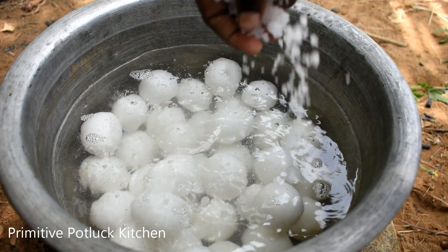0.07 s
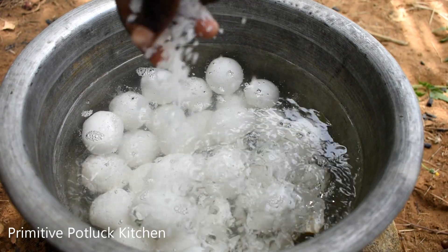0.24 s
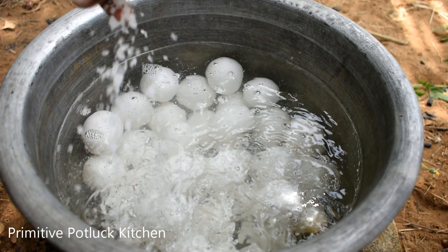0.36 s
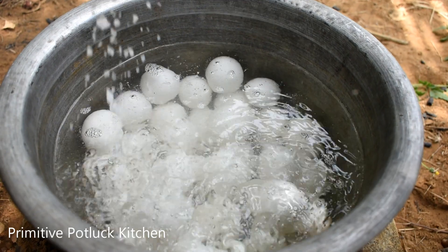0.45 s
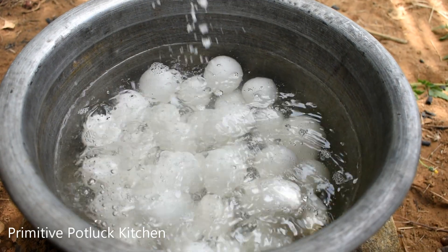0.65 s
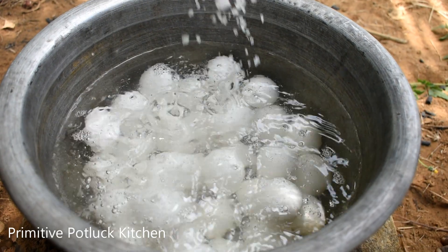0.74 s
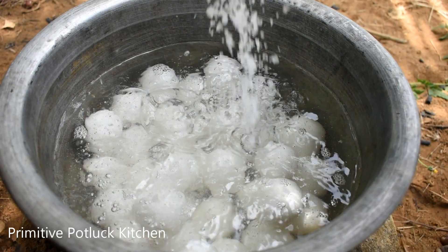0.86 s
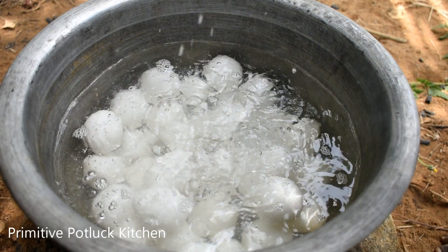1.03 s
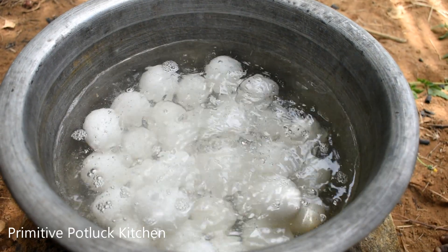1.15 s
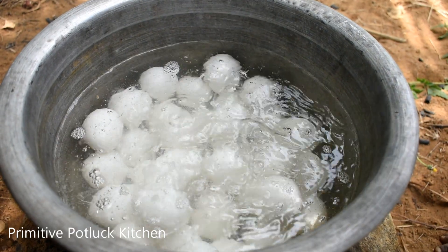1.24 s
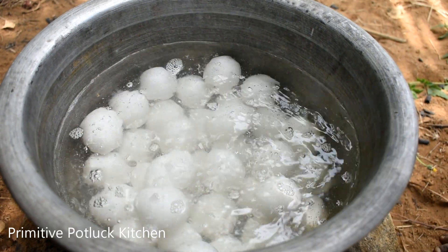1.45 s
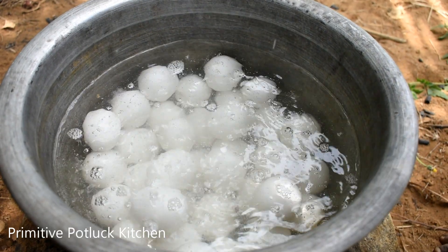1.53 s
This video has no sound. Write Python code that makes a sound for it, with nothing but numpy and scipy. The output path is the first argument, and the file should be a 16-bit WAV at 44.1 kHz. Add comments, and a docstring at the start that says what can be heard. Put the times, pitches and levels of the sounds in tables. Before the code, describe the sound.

Coarse salt patters into a metal pot of water and eggs outdoors, with sharp ticks on the shells, tiny splashes and bubbly plips close by. The sprinkle thins to a few stray ticks and a faint rustle.

```python
"""Outdoors, coarse salt is sprinkled into a metal pot of water and eggs.
Big crystals tick on the shells or slap the water and trap air bubbles that ring briefly.
Fine grains patter between them, and the pot's walls add a very short echo.
A small bird twitters faintly at first; near the end one grain pings on the pot and a little salt rustles."""
import sys
import numpy as np
from scipy import signal
from scipy.fft import rfft, irfft
from scipy.io import wavfile
from scipy.ndimage import uniform_filter1d

SR = 44100
rng = np.random.default_rng(int(sys.argv[2]) if len(sys.argv) > 2 else 0)


def file_out(sig):
    """Save sig as 16-bit WAV at sys.argv[1]."""
    # one column per channel
    cols = np.atleast_2d(sig).T
    # limit, then scale
    lim = np.clip(cols, -1, 1)
    pcm = np.round(lim * 32767).astype(np.int16)
    wavfile.write(sys.argv[1], SR, pcm)


N = 70560  # 1.6 seconds
TICK_RISE_MS = 0.048  # how fast a hit starts to ring
BUBBLE_RISE_SHARE = 0.07  # a bubble's rise time as a share of its fade time


def shell_ticks():
    """Big crystals hit the shells: a click, a very short ring, and echoes scattered among the eggs."""
    # crystals landing on eggshell: t/s, level/dB, f/Hz, fade time/ms
    shell_hits = [(.2160, -11.5, 7077, 1.7), (0.2503, -9, 9700, 0.52), (0.4211, -4.5, 9600, 0.27),
                  (0.4381, -9.5, 8400, 0.28), (.4431, -8, 10000, .16), (.4467, 3, 11250, 0.21),
                  (0.4479, 2.5, 9000, 0.14), (0.4565, 0.5, 8300, 0.29), (0.4585, -12.5, 6100, 0.57),
                  (.4694, -12, 7000, .35), (0.5228, -4, 8640, .5), (0.524, -8, 8050, 0.37),
                  (0.551, -12, 8400, 0.24), (0.573, -17, 12300, .25), (.5750, -13.5, 8870, 0.19),
                  (0.5933, -15, 9500, 0.3), (.6635, -6, 8400, 0.23), (.7148, -15, 7200, .3),
                  (.7190, -11.5, 8150, 0.27), (0.7421, -16.5, 7060, 0.34), (0.8732, -13, 5900, 0.22),
                  (0.8984, -14, 13000, 0.28), (0.915, -3, 7580, .28), (.9278, -11, 6800, 0.55),
                  (0.9452, -9, 6850, 0.34), (.9478, -14, 7100, 0.8), (0.9548, -1.5, 5460, 0.16),
                  (.9576, -1.5, 6820, 0.56), (0.9645, -15, 7200, .7), (1.047, -9, 13700, .3),
                  (1.0776, -8.5, 8500, 0.24), (1.0880, -7, 8400, 0.099), (1.163, -23, 6450, 0.38),
                  (1.2000, -24, 6390, 0.33), (1.2327, -22.5, 7680, 0.4), (1.2763, -20, 10300, 0.42),
                  (1.4698, -24, 9330, .6), (1.4873, -20, 9900, 0.22)]
    out, pulse = np.zeros(N), click()
    for start, db, hz, decay_ms in shell_hits:
        shell = amp(db) * ring(hz, decay_ms, TICK_RISE_MS)
        blip = ring(hz, decay_ms=0.047, rise_ms=TICK_RISE_MS)
        echoes = signal.fftconvolve(scatter(decay_ms=2.9), blip)
        echoes *= np.linalg.norm(shell) / np.linalg.norm(echoes)  # same energy as the ring
        add(out, start, shell)
        add(out, start, amp(-8) * echoes)
        add(out, start, amp(db - 7) * pulse)
    return amp(-2.5) * cut_bass(out, hz=2710)  # a small crystal gives off little bass


def splashes():
    """Crystals slap the water, throw a little spray and leave ringing bubbles."""
    # crystals landing on water: t/s, level/dB
    slaps = [(0.0862, -14.5), (.1812, -19), (0.2167, -9), (0.2288, -9.5), (0.2403, -16), (0.2835, -6.5),
             (.2902, -12), (.2949, -10.5), (0.3296, -13), (0.3452, -13), (0.356, -11), (0.365, -5),
             (.3995, -15), (.4035, -7.5), (0.5026, -11), (0.5165, -11), (0.6194, -5.5), (.6769, -17.5),
             (0.694, -16), (0.7372, -9.5), (0.7735, -15), (0.7893, -7.5), (0.796, -12.5), (0.8384, -6),
             (0.9573, -8), (0.9783, -12), (0.9918, -3.5), (1.0049, -16), (1.0403, -13), (1.0732, -9.5),
             (1.1027, -14)]
    # trapped air bubbles: t/s, level/dB, f/Hz, fade time/ms
    trapped_air = [(0.1813, -27.5, 4700, 1.3), (0.214, -21.5, 3730, 1.8), (0.2139, -17.5, 4890, 1.9),
                   (0.2292, -20.5, 2052, 4.5), (0.2407, -21.5, 1491, 4.1), (0.2538, -22.5, 3800, 0.99),
                   (0.283, -27, 1900, 2.9), (.3292, -27, 2880, 1.6), (0.3415, -22, 4177, 0.79),
                   (.349, -23, 3550, 1.6), (0.355, -27, 2630, 1.4), (.3722, -25.5, 1944, 3.6),
                   (0.3835, -24, 3600, 0.66), (0.4221, -18, 3020, 0.89), (.4400, -27, 2300, 2.7),
                   (.4430, -23, 2640, 2.3), (0.4468, -16.5, 2360, 0.9), (0.4514, -20, 1930, 2.3),
                   (0.456, -19.5, 4390, 1.9), (0.4916, -22.5, 1990, 2.5), (0.4945, -19.5, 3090, 1),
                   (.5027, -27, 2840, 2), (0.5155, -20, 1446, 2.36), (.5470, -26, 2940, 1.9),
                   (0.5514, -23.5, 2090, 2), (0.6192, -20.5, 1560, 5.2), (0.6513, -25.5, 3430, 1),
                   (.6624, -24.5, 3220, 1.5), (0.6772, -21, 3120, 2.2), (0.698, -26, 3700, .9),
                   (0.7368, -19, 2650, 1.3), (.7368, -17, 3400, 1.1), (0.7953, -20.5, 1960, 2.5),
                   (0.8390, -22.5, 1930, 3.3), (0.9207, -26, 2100, 4), (0.9252, -20.5, 2550, 1.8),
                   (0.9474, -18.5, 2000, 3.1), (.9510, -21, 3380, 1.8), (0.9729, -22.5, 1930, 2.8),
                   (0.9915, -18, 2080, 1.3), (0.9908, -34.5, 1042, 9), (1.0048, -20, 2030, 1.7),
                   (1.0130, -23, 3930, 1.1), (1.024, -27.5, 1710, 2.8), (1.0386, -23.5, 1837, 4.5),
                   (1.0499, -25, 3430, 2.6), (1.0528, -23, 1960, 2.6), (1.0730, -27.5, 2320, 3.23),
                   (1.0772, -21, 3000, 1.4), (1.0880, -22.5, 5040, 2.2)]
    # the biggest crystal's air pocket closing at the surface:
    # t/s, level/dB, f/Hz, fade time/ms, share of pitch gained each ms
    plop = (.9478, 0.87, 3850, 0.94, 0.074)
    out, pulse = np.zeros(N), click()
    for start, db in slaps:
        slap = amp(db - 1) * pulse
        spray = amp(-1.5) * signal.fftconvolve(scatter(decay_ms=0.69), slap)
        add(out, start, slap)
        add(out, start, spray)
    for start, db, hz, decay_ms in trapped_air:
        diving = bubble(hz, decay_ms, glide_per_ms=-0.0035)  # the pitch sinks as the bubble dives
        add(out, start, amp(db) * diving * churn())
    start, db, hz, decay_ms, climb = plop
    add(out, start, amp(db) * bubble(hz, decay_ms, climb))
    return cut_bass(out, hz=360)  # the water surface gives off little bass


def bubble(hz, decay_ms, glide_per_ms):
    """A pocket of air rings in the water, with little sound below its pitch."""
    tone = ring(hz, decay_ms, BUBBLE_RISE_SHARE * decay_ms, glide_per_ms)
    return cut_bass(tone, 0.37 * hz)


def churn(depth=0.22, size=2000):
    """Moving water makes a bubble's loudness flutter quickly."""
    return 1 + depth * wobble(size, smooth_samples=30)


def fine_salt():
    """Fine grains patter and bubble as the salt flows; clumps land as short, dense fizzes."""
    # how strongly the fine salt flows: t/s, level/dB
    flow_curve = [(0, -42.5), (.06, -49.5), (.09, -43), (.17, -46.5), (.205, -39), (.26, -34), (.31, -37.5),
                  (.41, -36.5), (.53, -31), (.6, -45.5), (.65, -38.5), (.69, -43), (.74, -32), (.77, -39.5),
                  (.81, -33.5), (.85, -40.5), (.9, -31.5), (.97, -32), (1.025, -34), (1.07, -31),
                  (1.105, -44), (1.16, -37.5), (1.2, -48.5), (1.3, -47), (1.6, -50.5)]
    # clumps of grains landing together: t/s, length/s, level/dB
    clumps = [(0.245, 0.022, -32.5), (0.458, 0.023, -33), (0.53, 0.011, -38), (0.63, 0.0087, -33.5),
              (0.797, 0.0051, -29), (0.855, .012, -32), (0.918, 0.011, -27), (1.034, 0.024, -26.5)]
    # tone colour of the grains: f/Hz, level/dB
    grain_colour = [(200, -41), (700, -9.5), (1300, -11), (2000, -6), (3400, -3.5), (5800, -2.5), (8000, 0),
                    (13000, -2.5), (16000, -10.5)]
    t = np.arange(N) / SR
    flow = amp(np.interp(t, *np.transpose(flow_curve)))
    bursts = np.zeros(N)
    for start, length, db in clumps:
        add(bursts, start, amp(db) * signal.windows.tukey(round(length * SR), 0.5))
    shower = coloured(patter(), grain_colour) + amp(-12.5) * small_bubbles()
    fizz = coloured(patter() + patter(), grain_colour)
    return flow * shower + bursts * fizz


def patter(pitches=40, spread_db=4):
    """Grains of many sizes land at random, each with a tiny ring; high ones come more often."""
    out = np.zeros(N)
    for hz in np.geomspace(800, 15500, pitches):
        hits_per_s = 3900 / pitches * np.sqrt(hz / 5000)
        strength = amp(spread_db * np.minimum(rng.exponential(1, N), 3.5))
        hits = strength * rng.choice([-1, 1], N) * (rng.random(N) < hits_per_s / SR)
        decay_cycles = 2.2 * rng.uniform(0.5, 1.5)
        grain = ring(hz, 1000 * decay_cycles / hz, TICK_RISE_MS)
        # high pitches lie further apart, so they are made louder to keep the tone even
        out += np.sqrt(hz) * unit(signal.oaconvolve(hits, grain)[:N])
    return out


def small_bubbles(pitches=24, bubbles_per_s=180, decay_cycles=6.8):
    """Many little bubbles of random size ring under the falling grains."""
    out = np.zeros(N)
    for hz in np.geomspace(1500, 5500, pitches):
        hits = rng.uniform(0.17, 1, N) * (rng.random(N) < bubbles_per_s / pitches / SR)
        decay_ms = 1000 * decay_cycles / hz
        out += signal.oaconvolve(hits, ring(hz, decay_ms, BUBBLE_RISE_SHARE * decay_ms))[:N]
    return unit(out)


def pot_ping(start=1.4227, level_db=-28):
    """A stray grain makes the metal wall ring with several tones at once."""
    # the pot's own tones: f/Hz, level/dB, time to fade by 60 dB/s
    pot_tones = [(4070, -23, .07), (6153, -19, .08), (8000, -7, 0.059), (8694, -8, 0.049),
                 (10600, -1, 0.013), (11500, -4, 0.022), (15300, -1, .008)]
    out, t = np.zeros(N), np.arange(SR // 10) / SR
    for hz, db, fade_s in pot_tones:
        add(out, start, amp(level_db + db - 60 * t / fade_s) * np.sin(2 * np.pi * hz * t))
    return out


def pot_walls(sound, echo_db=-11, delay_s=0.001, fade_s=0.03):
    """Sound bounces between the water and the wall, adding dense echoes that die quickly."""
    t = np.arange(SR // 10) / SR
    tail = rng.standard_normal(len(t)) * (t > delay_s) * amp(-60 * t / fade_s)
    return sound + amp(echo_db) * signal.oaconvolve(sound, tail / np.linalg.norm(tail))[:N]


def salt_rustle():
    """Dry grains slide over each other: a quick swell and a slower fade."""
    # the slide: t/s, rise time/s, fade time/s, level/dB
    slide = (1.452, .035, .14, -40.5)
    # tone colour of dry salt: f/Hz, level/dB
    rustle_colour = [(1000, -45), (4000, -17), (7000, -9), (9300, -2), (12000, -4.5), (16000, 0)]
    start, rise, decay, db = slide
    t = np.arange(N) / SR - start
    swell = np.clip(t / rise, 0, 1)
    fade = np.exp(-np.maximum(t - rise, 0) / decay)
    return amp(db) * swell * fade * coloured(patter() + patter(), rustle_colour)


def bird(start=0.0155, end=0.192, period_s=0.0293, low_hz=5300, high_hz=5730, wander_hz=69):
    """A distant bird's trill grows louder; its whistle swings up softly and down more strongly."""
    t = np.arange(N) / SR
    turn = 2 * np.pi * (t - start) / period_s
    hz = low_hz + (high_hz - low_hz) * np.sin(turn / 2) ** 2
    hz += wander_hz * wobble(N, smooth_samples=900)  # no two swings are alike
    rising = np.sin(turn) > 0
    strokes = abs(np.sin(turn)) * np.where(rising, amp(-10), 1)
    swell = amp(-35.5 - 100 * abs(end - t)) * (t > start) * (t < end)  # gains 100 dB a second
    return swell * strokes * np.sin(2 * np.pi * np.cumsum(hz) / SR)


def outdoor_air():
    """A faint, steady hush lies behind everything."""
    # tone colour of the background: f/Hz, level/dB
    air_colour = [(20, -36), (60, -26), (100, -18), (150, -11.5), (300, -5), (600, -3.5), (1100, -4),
                  (2000, -7), (3500, -11), (8000, -12.5), (13000, -11), (16000, -12)]
    return amp(-46) * coloured(rng.standard_normal(N), air_colour)


def ring(hz, decay_ms, rise_ms, glide_per_ms=0, size=2000):
    """A tone that starts fast and dies away; a positive glide raises its pitch as it goes."""
    ms = np.arange(size) / SR * 1000
    loudness = np.exp(-ms / decay_ms) * (1 - np.exp(-ms / rise_ms))
    pitch = hz * (1 + glide_per_ms * (ms - decay_ms))
    return loudness / loudness.max() * np.sin(2 * np.pi * np.cumsum(pitch) / SR)


def click(size=1024):
    """The single sharp pulse of pressure from a landing crystal."""
    # tone colour of the pulse: f/Hz, level/dB
    click_colour = [(100, -41), (500, -9.5), (1200, -12), (3000, 3.5), (5000, 3.5), (8000, 3.5),
                    (13000, 1.5), (16000, -2.5)]
    log_gain = np.log(gain_at(click_colour, abs(np.fft.fftfreq(size, 1 / SR))))
    spectrum = np.exp(np.conj(signal.hilbert(log_gain)))  # packs the energy at the very start
    pulse = np.fft.ifft(spectrum).real[:size // 2]
    return -pulse / abs(pulse).max()


def scatter(decay_ms, size=1200):
    """A burst of random echoes that die quickly, new for every hit."""
    ms = np.arange(size) / SR * 1000
    tail = rng.standard_normal(size) * np.exp(-ms / decay_ms)
    return tail / np.linalg.norm(tail)


def wobble(size, smooth_samples):
    """A random wavering; more smoothing makes it slower."""
    return unit(uniform_filter1d(rng.standard_normal(size), size=smooth_samples))


def cut_bass(sound, hz):
    """Weakens everything below the given frequency."""
    return signal.sosfilt(signal.butter(2, hz, "highpass", fs=SR, output="sos"), sound)


def coloured(sound, colour):
    """Gives a sound a tone colour and an average level of 1."""
    return unit(irfft(rfft(sound) * gain_at(colour, np.fft.rfftfreq(N, 1 / SR)), N))


def gain_at(colour, hz):
    """Looks up how strong each frequency is in a tone colour table."""
    table_hz, db = np.transpose(colour)
    return amp(np.interp(np.log(hz + 1), np.log(table_hz), db))


def amp(db):
    """Turns decibels into a number to multiply by."""
    return 10 ** (np.asarray(db) / 20)


def unit(sound):
    """Scales a sound to an average level (rms) of 1."""
    return sound / np.sqrt(np.mean(sound ** 2) + 1e-20)


def add(mix, start, sound):
    """Mixes a sound in at a start time in seconds."""
    part = mix[max(round(start * SR), 0):][:len(sound)]
    part += sound[:len(part)]


def scene():
    """Mixes the salt in the pot with the rustle, the bird and the air, in one channel."""
    in_pot = pot_walls(shell_ticks() + splashes() + fine_salt() + pot_ping())
    return (in_pot + salt_rustle() + bird() + outdoor_air())[None]


def record(dry, top_hz=16000):
    """Flattens any peak beyond full level, then cuts the very highest treble."""
    clipped = np.clip(dry, -1, 1)
    treble_cut = signal.firwin(401, top_hz, window=("kaiser", 9), fs=SR)
    return signal.oaconvolve(clipped, treble_cut[None], "same")


dry = scene()
out = record(dry)
file_out(out)
```